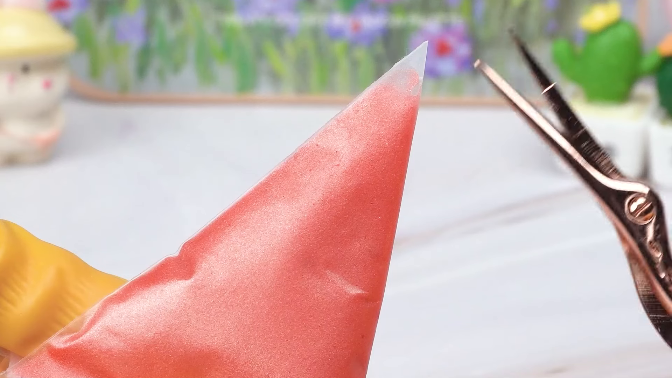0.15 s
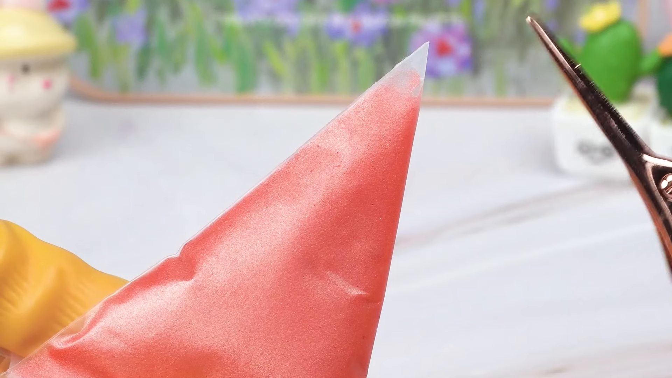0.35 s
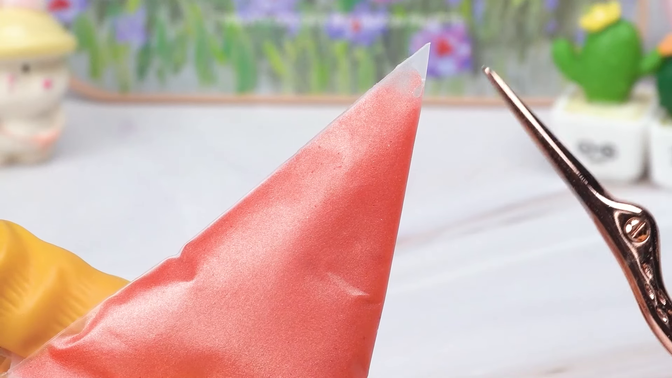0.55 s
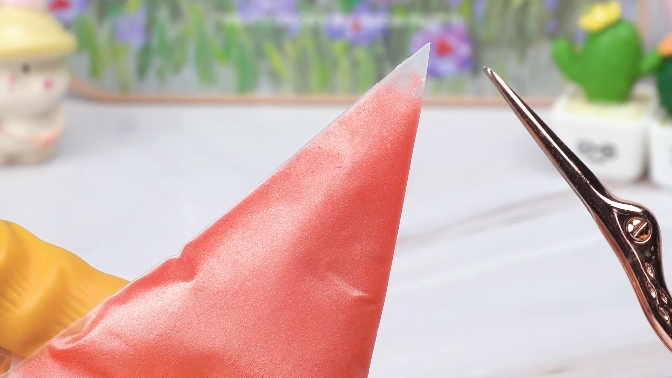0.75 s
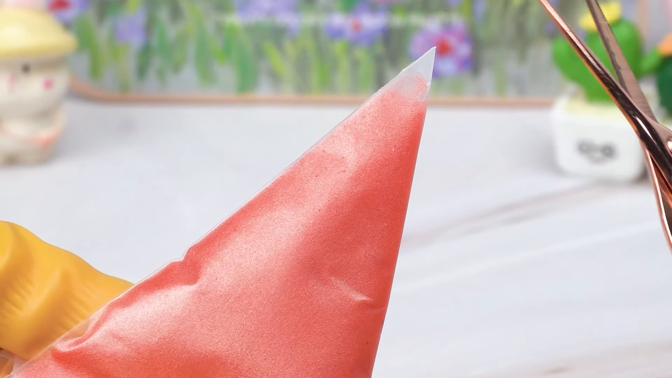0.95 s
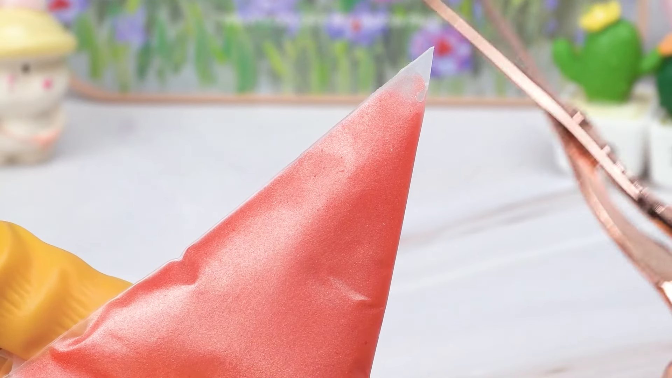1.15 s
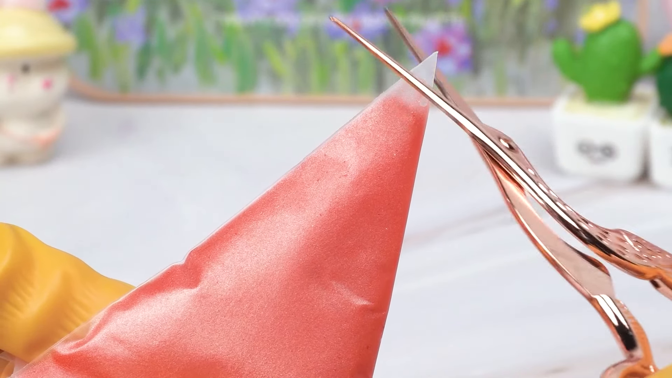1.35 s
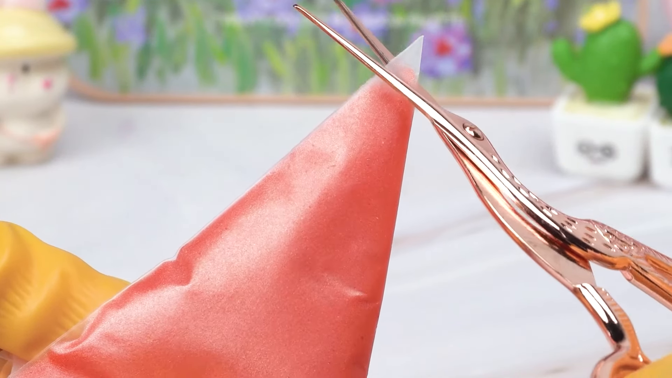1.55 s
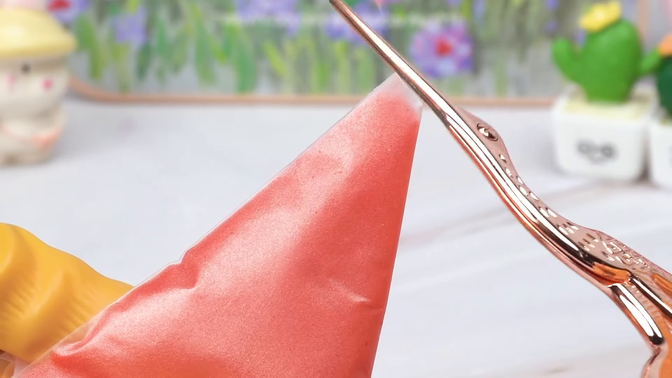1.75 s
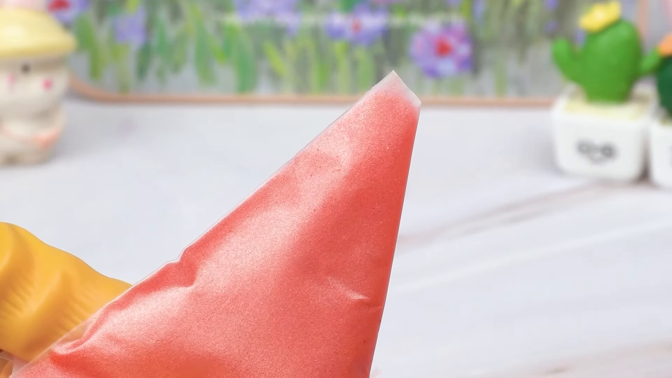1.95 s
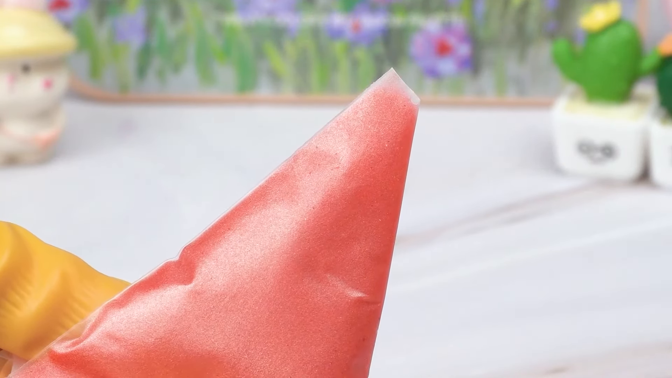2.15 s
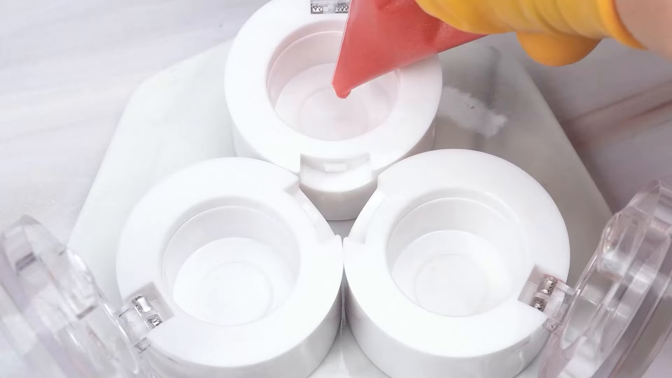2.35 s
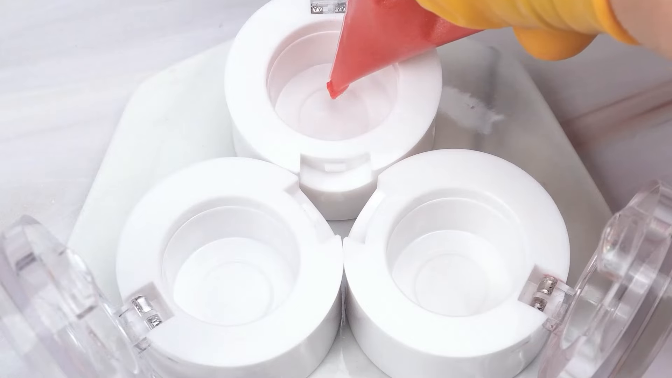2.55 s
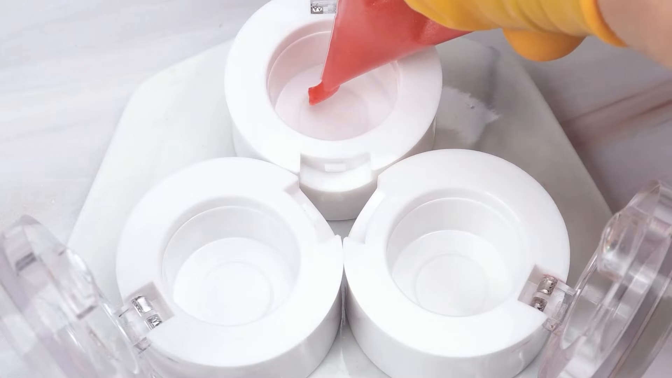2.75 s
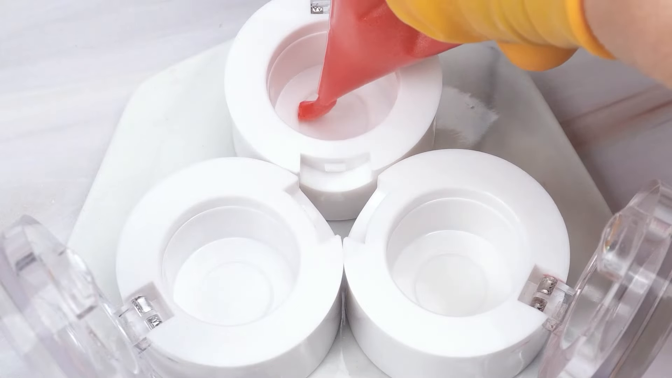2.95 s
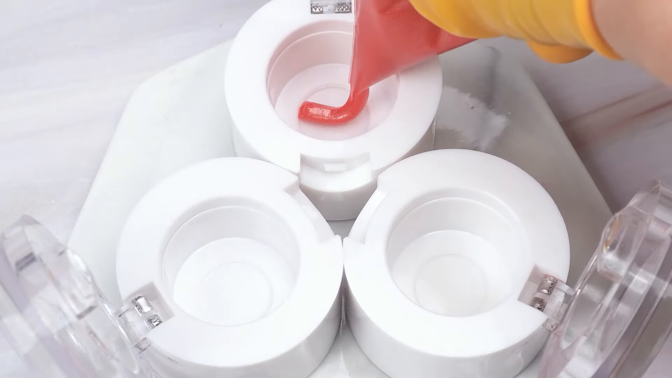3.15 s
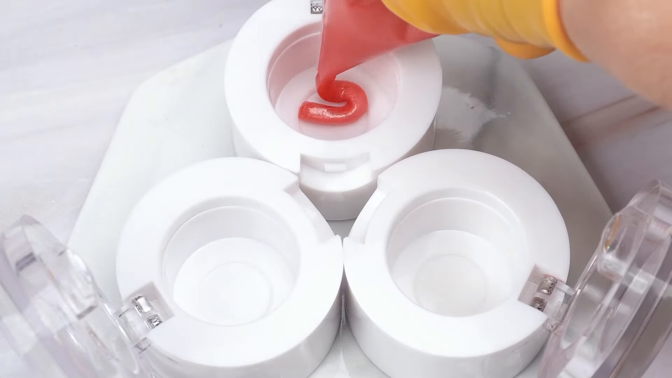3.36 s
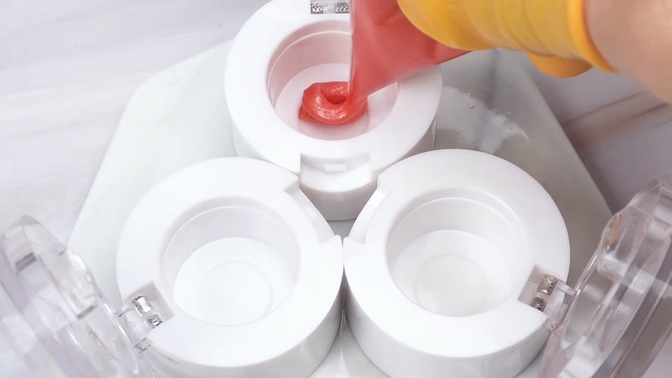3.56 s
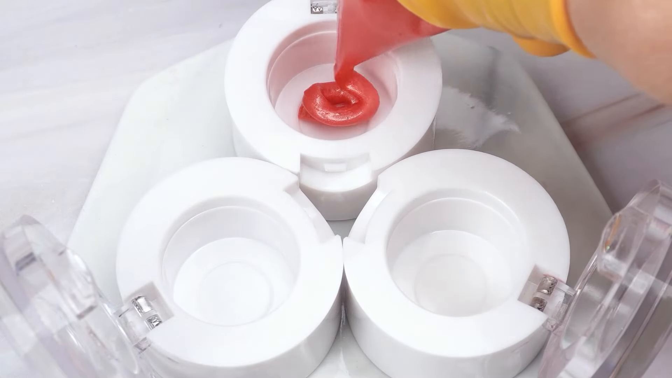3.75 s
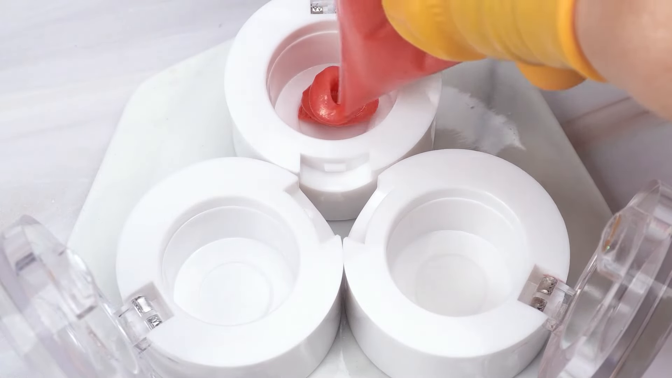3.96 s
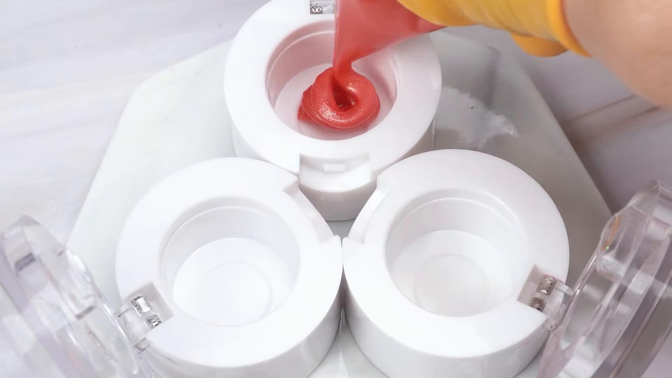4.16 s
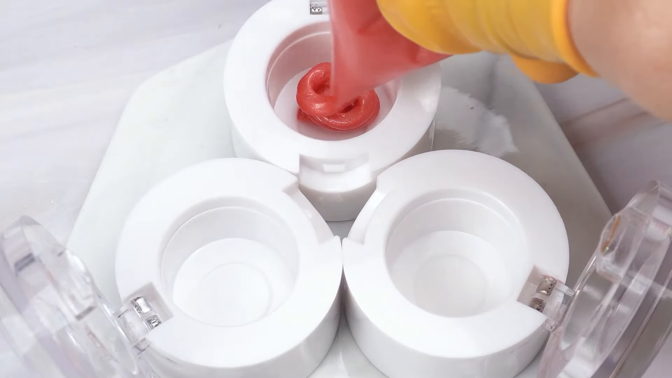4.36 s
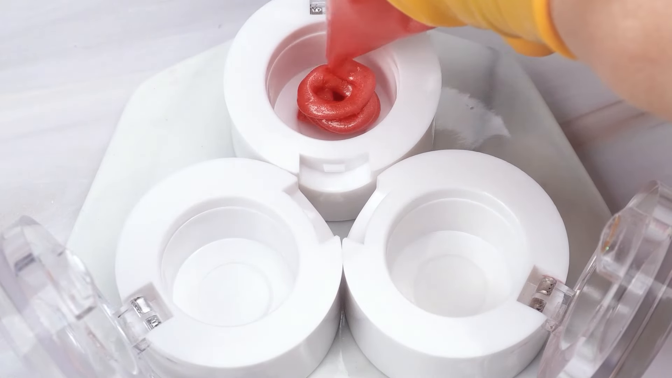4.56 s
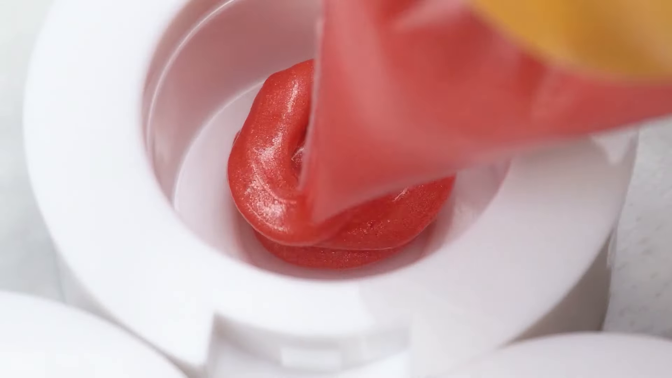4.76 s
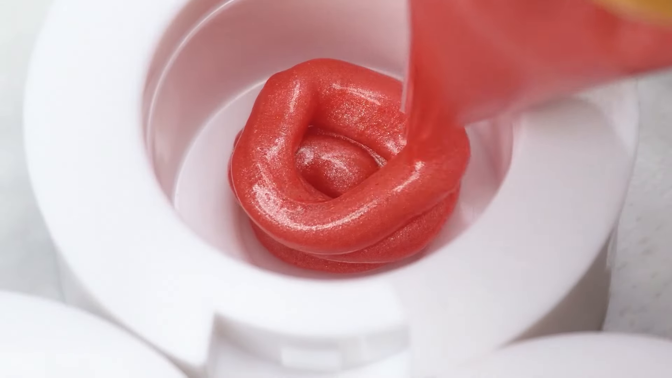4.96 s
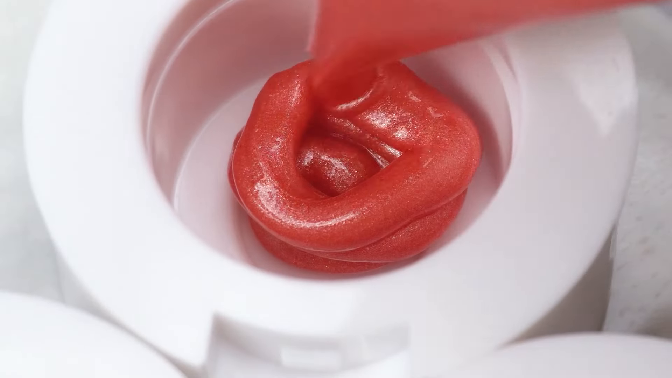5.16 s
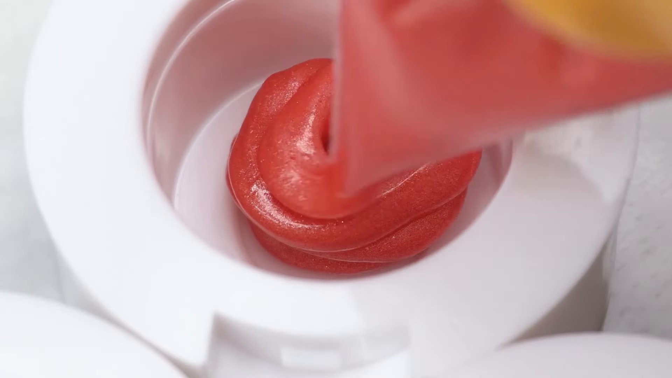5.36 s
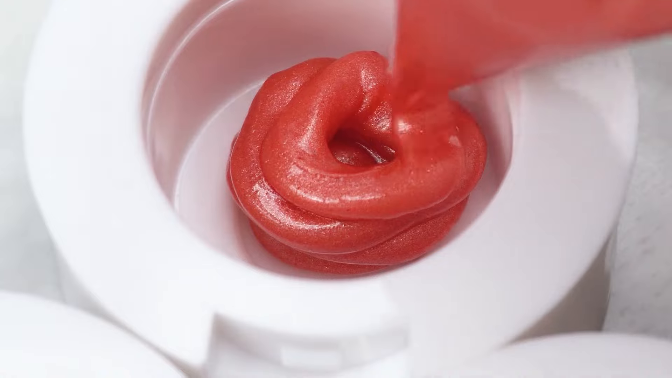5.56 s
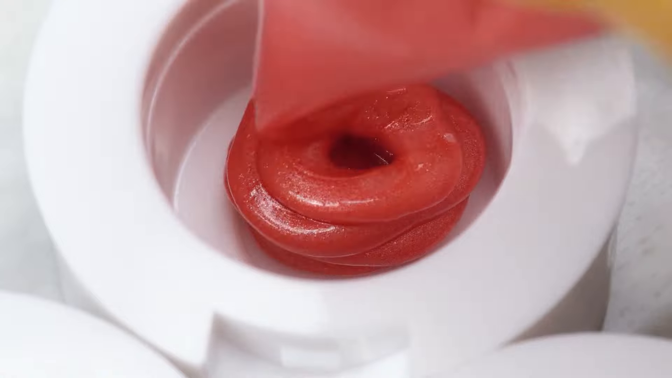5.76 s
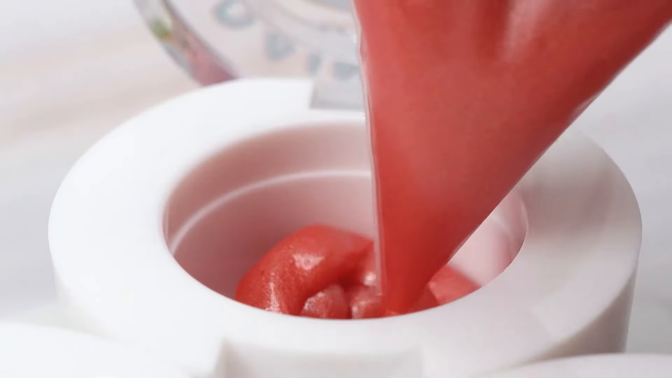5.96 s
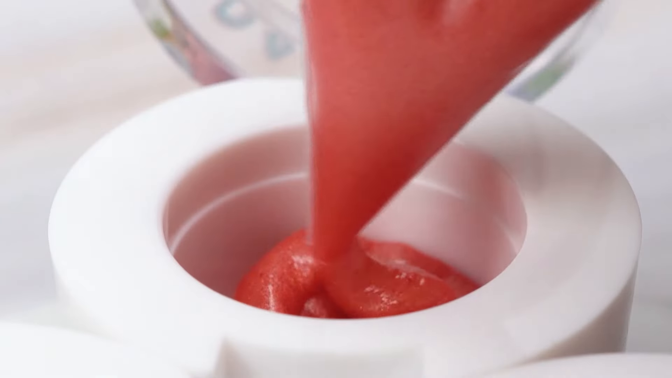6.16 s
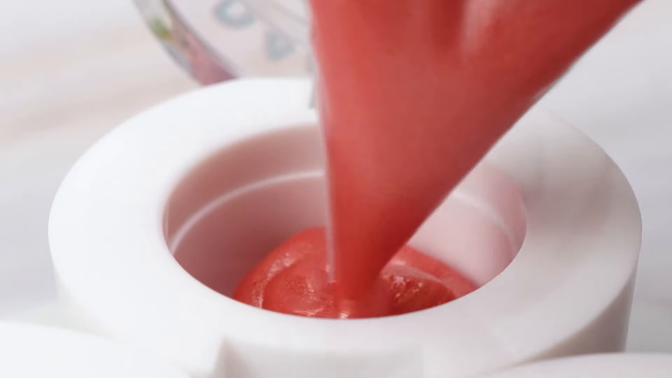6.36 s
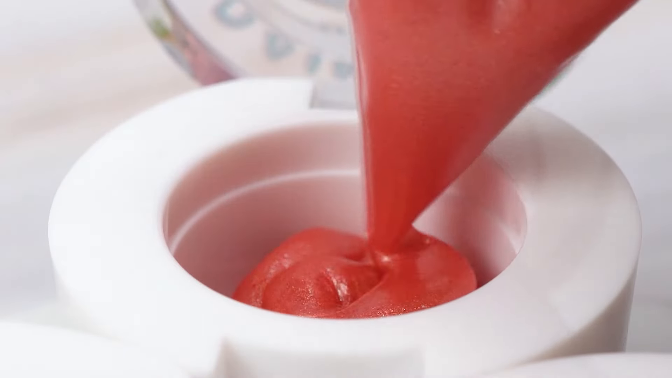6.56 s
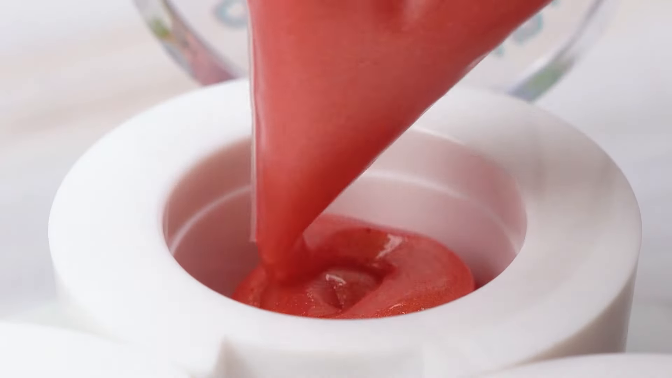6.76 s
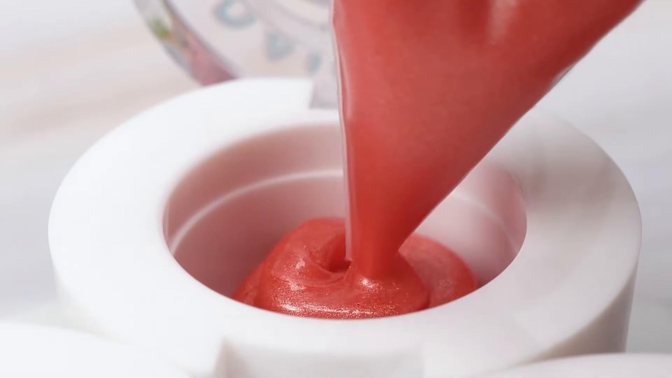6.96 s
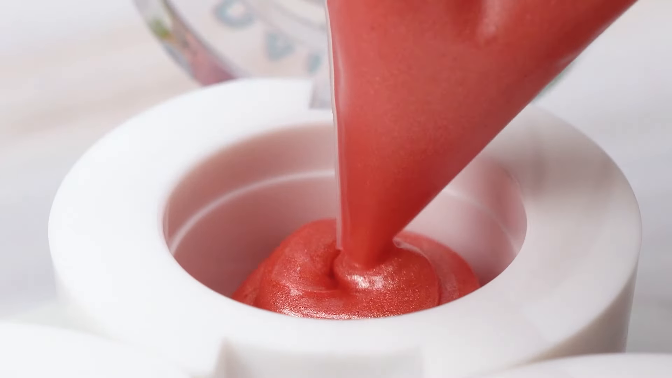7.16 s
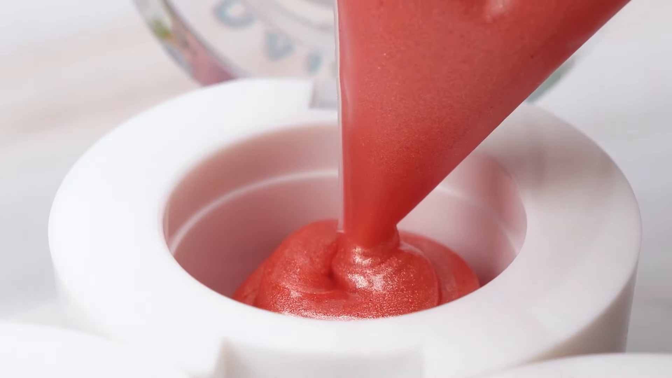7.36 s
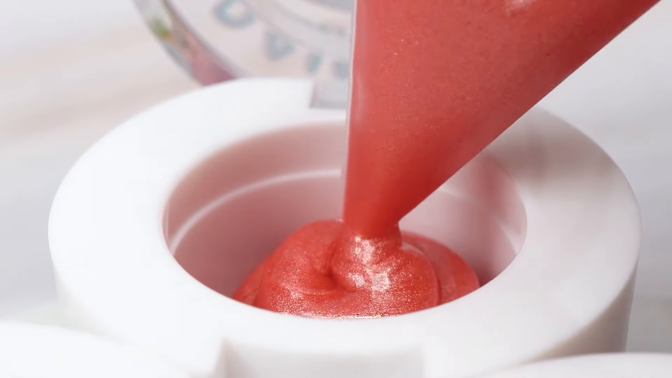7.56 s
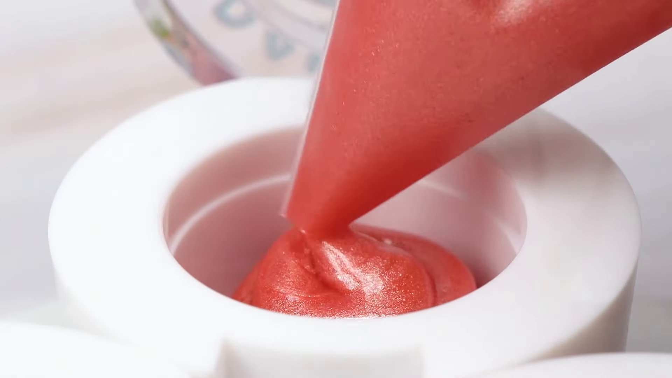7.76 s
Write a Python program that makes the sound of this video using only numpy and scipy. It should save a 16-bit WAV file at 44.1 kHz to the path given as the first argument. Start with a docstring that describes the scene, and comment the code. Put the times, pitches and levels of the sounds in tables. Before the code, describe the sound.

Very close on a quiet tabletop with soft ventilation murmur and hiss, small steel scissors click three times, squeak thinly, and cut through plastic film with a crisp crackle. They click shut and the tiny cut tip ticks onto the table. After a short pause, gloved hands squeeze the thin bag, crinkling densely and sharply, then more sparsely until it dies away.

```python
"""Close-miked tabletop in a quiet room, under a ventilation murmur with hiss, made of coloured noise.
Small steel scissors click (noisy contacts ring steel modes), then squeak open on two wavering sines.
They snip a plastic bag's tip (film bucklings and fine crackle) and click again; the tip drops and bounces.
Gloved hands then squeeze the bag: its thin film crackles in ringing snaps over a bed of filtered ticks,
with a low rumble of the hand, and near the end stretches of the crackle are heard once more."""
import sys
import numpy as np
from scipy import signal
from scipy.fft import rfft, irfft
from scipy.io import wavfile
from scipy.ndimage import uniform_filter1d

SR = 44100
rng = np.random.default_rng(int(sys.argv[2]) if len(sys.argv) > 2 else 0)


def log_audio(samples):
    """Write samples as a 16-bit WAV file to the path given in sys.argv[1]."""
    # one column per channel
    frames = np.atleast_2d(samples).T
    # limit to full scale, then quantise
    limited = np.clip(frames, -1, 1)
    pcm = np.round(limited * 32767).astype(np.int16)
    wavfile.write(sys.argv[1], SR, pcm)


def level_to_linear(level):
    """Convert decibel levels to linear amplitude factors, elementwise."""
    exponent = np.asarray(level, float) / 20
    return 10 ** exponent


N = 344421  # samples
TIME = np.arange(N) / SR  # s


def unit(x):
    """Scale to rms 1."""
    return x / np.sqrt(np.mean(x ** 2))


def ring(f, hz, sharp):
    """Response of a damped resonance, gain 1 at its centre."""
    return 1 / (1 + 1j * sharp * (f / hz - hz / f))


def bins(size):
    """Spectrum frequencies in Hz, kept off zero."""
    return np.maximum(np.fft.rfftfreq(size, 1 / SR), 1)


def coloured(points):
    """Noise of rms 1 with a spectrum drawn through (Hz, dB) points."""
    hz, db = np.transpose(points)
    colour = level_to_linear(np.interp(np.log(bins(N)), np.log(hz), db))
    return unit(irfft(rfft(rng.standard_normal(N)) * colour, N))


def add(out, s, sound):
    """Mix a short sound in at time s."""
    i = int(s * SR)
    n = min(len(sound), N - i)
    out[i:i + n] += sound[:n]


def tail(x, t60, db, lo_hz):
    """Short diffuse echo of the table top and nearby walls: decaying noise, convolved."""
    t = np.arange(int(t60 * SR)) / SR
    decay = np.exp(-np.log(1000) * t / t60)
    echo = rng.standard_normal(len(t)) * decay * np.minimum(t / 0.003, 1)
    echo = signal.sosfilt(signal.butter(2, lo_hz, "high", fs=SR, output="sos"), echo)
    echo = signal.sosfilt(signal.butter(1, 4000, fs=SR, output="sos"), echo)  # surfaces soak up the treble
    echo = echo / np.sqrt(np.sum(echo ** 2))
    return x + level_to_linear(db) * signal.fftconvolve(x, echo)[:len(x)]


# Spectrum of the murmur and hiss. Each row: frequency in Hz, relative level in dB.
ROOM_SPECTRUM = [(15, -40.5), (25, -10.5), (70, -17), (103, -3.5), (135, -2.5), (170, -0.5), (290, -8),
                 (350, -5), (500, -8.5), (800, -11.5), (1100, -15.5), (1500, -25), (2100, -30),
                 (5000, -32.5), (12200, -33.5), (15500, -37), (16500, -65)]
# The murmur is wide around the blows. Each row: time in seconds, side against mid level in dB.
ROOM_WIDTH = [(0, -6), (.75, -8), (.9, -37.5), (1.72, -33), (1.8, -6), (2.15, -6), (2.25, -38),
              (2.65, -35.5), (2.8, -57)]


def room():
    """Ventilation murmur over microphone hiss: steady mid noise and side noise of changing level."""
    level_db = -65.5
    mid = coloured(ROOM_SPECTRUM)
    side = coloured([(40, -24.5), (150, 1.5), (800, -11), (2400, -22), (15000, -29.5), (17000, -40.5)])
    width = level_to_linear(np.interp(TIME, *np.transpose(ROOM_WIDTH)))
    return level_to_linear(level_db) * (mid + width * side * np.array([[1], [-1]]))


# Rumble of the hand. Each row: time in seconds, level in dB.
HAND_RUMBLE = [(2.45, -95), (2.9, -83), (3.4, -70), (4.9, -72), (5.4, -74.5), (6.45, -72.5), (6.6, -68),
               (7.1, -66), (7.81, -69.5)]


def rumble():
    """The working hand shakes the table: low noise that follows a level curve."""
    shake = coloured([(15, -32), (30, -11.5), (42, -2.5), (70, -17.5), (120, -12.0), (300, -65)])
    return shake * level_to_linear(np.interp(TIME, *np.transpose(HAND_RUMBLE), left=-120))


def struck(events, modes, chatter_s, rattle_s, rattle_db, rise_db, crack_db, echo_db, echo_t60, dull):
    """A short rise of noise leads into a brief chatter and softer rattle; each channel has its own mode mix."""
    knock_db = -20.5  # the little bass that a blow does pass on
    right_lag_s = 0.0024  # sounds off to the side reach the right channel late
    right_shine_db = 13  # at 15 kHz: the right channel faces the blades and gets more of the top
    out, t, lead = np.zeros((2, N)), np.arange(1024) / SR, .004
    hz, db, t60 = np.transpose(modes)[:, :, None]
    rattle = level_to_linear(rattle_db) * np.exp(-((t - lead - rattle_s) / 0.00089) ** 2)
    rise = level_to_linear(rise_db) * (t / lead) ** 2
    force = np.where(t < lead, rise, np.exp(-(t - lead) / chatter_s) + rattle)
    # small objects radiate little bass
    thin = signal.ellip(6, 1, 60, 1950, "high", fs=SR, output="sos")
    for s, level_db, right_db in events:
        softer_db = level_db - events[0][1]  # a gentler contact misses the high modes
        for ch in range(2):
            spread_db = 2 * rng.standard_normal(hz.shape) + ch * right_shine_db * (hz / 15000) ** 4
            mix = level_to_linear(db + spread_db + dull * softer_db * np.log2(hz / hz[0]))
            decay = np.exp(-np.log(1000) * t / t60)
            body = np.sum(mix * np.sin(2 * np.pi * hz * t) * decay, axis=0)
            body[0] = level_to_linear(crack_db + dull * softer_db)  # direct crack of the contact
            push = force * rng.standard_normal(len(t))
            push[int(lead * SR)] = 2
            blow = np.convolve(push, body)
            blow = signal.sosfilt(thin, blow) + level_to_linear(knock_db) * blow
            peak = 2 * level_to_linear(level_db + (ch - 1.5) * right_db)
            add(out[ch], s - lead + ch * right_lag_s, peak * blow / np.abs(blow).max())
    return np.array([tail(x, echo_t60, echo_db, 1200) for x in out])


# The cut tip landing and bouncing.
# Each row: time in seconds, relative peak level in dB, right minus left in dB.
TIP_BOUNCES = [(1.9747, -23.5, 1), (2.0263, -47.5, 0), (2.0592, -53.5, -7.5), (2.0844, -53, 3),
               (2.1206, -46.5, 7)]
# Modes of the tip. Each row: frequency in Hz, relative level in dB, 60 dB decay in seconds.
TIP_MODES = [(2490, -25, 0.023), (2860, -15.5, 0.012), (3350, -6.5, 0.0039), (4360, -7, 0.006),
             (6400, 2.5, 0.001), (8900, -6.5, 0.0017), (10600, -13, .002)]


def tip():
    """The light plastic tip hits the table; its short modes dull as the bounces get softer."""
    return struck(TIP_BOUNCES, TIP_MODES, chatter_s=0.00038, rattle_s=0.0016, rattle_db=-38, rise_db=-18.0,
                  crack_db=0, echo_db=-13.5, echo_t60=0.086, dull=0.51)


# Pivot squeak, lower and upper pitch. Each row: time in seconds, pitch in Hz, rms level in dB.
LOW_SQUEAK = [(1.25, 11226, -93), (1.3, 11763, -77.5), (1.314, 11480, -92), (1.362, 11321, -83),
              (1.38, 11533, -107), (1.4, 10990, -96)]
HIGH_SQUEAK = [(1.24, 13140, -89), (1.248, 13337, -77.5), (1.278, 13722, -92), (1.342, 12770, -90),
               (1.422, 12159, -91), (1.43, 11990, -95)]


def squeak():
    """The pivot sticks and slips at two thin wavering pitches as the blades open: gliding sines."""
    out = 0
    for table in LOW_SQUEAK, HIGH_SQUEAK:
        s, hz, db = np.transpose(table)
        gain = np.interp(TIME, s, level_to_linear(db), left=0, right=0)
        phase = 2 * np.pi * np.cumsum(np.interp(TIME, s, hz)) / SR
        out = out + np.sqrt(2) * gain * np.sin(phase)
    return out


# Blades meeting. Each row: time in seconds, relative peak level in dB, right minus left in dB.
BLADES_MEET = [(.075, -12, 0.5), (.32, -9.5, 5.5), (.5972, -14.5, 5), (1.8217, -12, 3.5)]
# Modes of the steel. Each row: frequency in Hz, relative level in dB, 60 dB decay in seconds.
STEEL_MODES = [(2060, -3, 0.0021), (3180, -16, 0.011), (4600, -20, 0.013), (5600, -49, 0.0047),
               (7150, 0.5, 0.011), (8500, -11.5, 0.014), (10700, 2.5, 0.0032), (11530, 3, 0.0042),
               (13280, -0.5, 0.0055), (14680, 0, 0.0052), (14400, -1, 0.0076)]


def scissors():
    """Steel blades meet: a very short noisy contact rings bright, fast-dying modes."""
    return struck(BLADES_MEET, STEEL_MODES, chatter_s=0.00026, rattle_s=0.0048, rattle_db=-17.5, rise_db=-20,
                  crack_db=-31, echo_db=-17, echo_t60=.12, dull=0)


# Tone of the crackle over time: the top end falls after about three seconds.
# Each row: time in seconds, bass resonance in Hz, treble resonance in Hz, lowest top limit in Hz.
CRACKLE_TONE = [(1.5, 830, 11900, 17000), (2.8, 790, 11400, 16600), (3.9, 864, 9500, 13300),
                (4.9, 1288, 9500, 14400), (5.3, 1317, 8600, 11000)]


def creases(events, sharp=2.01, snap_s=0.0002, shiver_db=-21, shiver_s=0.0044, swell_db=-22, side_db=-4):
    """A short swell of noise, then a panel of film snaps through and shivers at its pitch, with bass and fizz."""
    out, size, lead = np.zeros(N), 2048, 128  # lead: samples of swell before the snap
    s, peak_db, hz, bass_db, treble_db = np.transpose(events)[:, :, None]
    t, f = (np.arange(size) - lead) / SR, bins(size)
    shiver = level_to_linear(shiver_db + 2.5 * rng.standard_normal(s.shape))
    shiver = shiver * np.exp(-np.abs(t) / shiver_s * np.sqrt(hz / 3000))  # high panels settle sooner
    swell = level_to_linear(swell_db) * np.exp(-np.abs(t) / 0.00078)
    force = np.where(t < 0, swell, 1.01 * np.exp(-np.abs(t) / snap_s) + shiver)
    grain = rng.standard_normal((len(s), size)) * rng.exponential(size=(len(s), size))
    push = grain * force
    push[:, lead] = 1
    when, *tone = np.transpose(CRACKLE_TONE)
    bass_hz, treble_hz, top_hz = (np.interp(s, when, c) for c in tone)
    push = rfft(push) / (1 + (f / np.maximum(top_hz, 1.2 * hz)) ** 12)
    parts = [(ring(f, hz, sharp), -side_db),
             (ring(f, bass_hz, 0.79), bass_db),
             (ring(f, treble_hz, 0.79), treble_db),
             (ring(f, 2160, 1.0), (bass_db + treble_db) / 2 + side_db)]
    snaps = 0
    for response, db in parts:
        part = irfft(push * response ** 2, size)
        snaps = snaps + level_to_linear(db) * part / np.abs(part).max(axis=1, keepdims=True)
    snaps = snaps * level_to_linear(peak_db) / np.abs(snaps).max(axis=1, keepdims=True)
    for at, snap in zip(s[:, 0], snaps):
        add(out, at - lead / SR, snap)
    return out


# Pressure on the bag. Each row: time in seconds, relative fine crackle level in dB, dullness in dB.
HAND_PRESSURE = [(2.449, -88.5, -2.5), (2.56, -74, -1.5), (2.75, -67.5, 3.5), (2.88, -59.5, 0),
                 (3.139, -61, 2.5), (3.37, -62, 1), (3.461, -59.5, 3.5), (3.8, -64, 5.5), (4.24, -66, 1.5),
                 (4.449, -72, 2.5), (4.569, -61, 4), (4.72, -57, 0.5), (4.869, -58.5, 3), (5.001, -73, 1),
                 (5.151, -63, 1.5), (5.29, -72, 2.5), (5.901, -74.5, 9.5), (6.05, -68, 2), (6.24, -68, 3.5),
                 (6.748, -81.5, 0)]


def small_creases(count=170, db_per_doubling=7.0, over_db=19, scatter_db=1.5, lo_hz=1800, hi_hz=11000,
                  bass_db=-12, treble_db=-3, treble_db_per_dullness=-4.0, colour_db=6):
    """Lesser bucklings at random moments, thicker and stronger the harder the fingers press."""
    s, db, dull_db = np.transpose(HAND_PRESSURE)
    even, bell = rng.random((count, 2)).T, rng.standard_normal((count, 3)).T
    odds = np.cumsum(2 ** (np.interp(TIME, s, db, left=-200, right=-200) / db_per_doubling))
    at = np.interp(even[0], odds / odds[-1], TIME)
    peak = np.interp(at, s, db) + over_db + scatter_db * bell[0]
    hz = lo_hz * (hi_hz / lo_hz) ** even[1]
    bass = bass_db + colour_db * bell[1]
    treble = treble_db + treble_db_per_dullness * np.interp(at, s, dull_db) + colour_db * bell[2]
    return np.transpose([at, peak, hz, bass, treble])


# Panels of film, big to small.
# Each row: resonance in Hz, relative level in dB, level change in dB per dB of dullness.
FILM_PANELS = [(757, -5, -5.5), (1553, -10.5, 2), (2670, -8.5, -1.15), (4200, -9, 0.2), (6500, -4.5, -1.78),
               (9500, -5, -5.5)]


def handling(table, snaps, rate=3500, scatter_db=5.0, near_s=0.0066, near_db=-16, fits_db=7.0):
    """Countless tiny creases (rate per second and panel size), thickest just after the big snaps."""
    s, db, dull_db = np.transpose(table)
    fade = np.clip(np.minimum(TIME - s[0], s[-1] + .02 - TIME) / .02, 0, 1)
    memory = np.exp(-TIME[:2048] / near_s) / near_s / SR
    near = np.sqrt(np.abs(signal.fftconvolve(snaps ** 2, memory)[:N]))
    dull_db, f, out = np.interp(TIME, s, dull_db), bins(N), 0
    for hz, panel_db, slope in FILM_PANELS:
        size = level_to_linear(scatter_db * np.minimum(rng.exponential(size=N), 3))  # larger ones are the big snaps
        ticks = (rng.random(N) < rate / SR) * rng.standard_normal(N) * size
        # each panel works in fits
        steps = np.repeat(rng.standard_normal(N // 600 + 1), 600)[:N]
        busy = unit(uniform_filter1d(steps, size=600))
        response = ring(f, hz, 1.1) ** 2 / (1 + (f / 13500) ** 8)
        crackle = unit(irfft(rfft(ticks) * response, N))
        out = out + level_to_linear(panel_db + slope * dull_db + fits_db * busy) * crackle
    level = level_to_linear(np.interp(TIME, s, db)) + level_to_linear(near_db) * near
    return fade * out * level / 2


# Stretches of the crackle heard once more, in turn. Each row: start in seconds, end in seconds,
# delay in seconds, gain in dB, cross-fade in seconds.
REPEATS = [(5.217, 5.553, .4109, 0, .004), (5.282, 6.6, 1.3182, 6, .2)]


def returning(x):
    """Each returning stretch fades in over what was sounding."""
    for start, end, later, db, fade in REPEATS:
        inside = np.minimum(TIME - later - start, end + later - TIME)
        share = np.clip(.5 + inside / fade, 0, 1)
        x = (1 - share) * x + share * level_to_linear(db) * np.roll(x, round(later * SR))
    return x


# The loud bucklings of the film, first under the blades, then the fingers.
# Each row: time in seconds, peak in dB, ring in Hz, relative bass in dB, relative treble in dB.
LOUD_CREASES = [(1.5316, -55, 1790, 2, -4), (1.5582, -60, 2000, -2, -13), (1.5804, -51.5, 6570, -11, -3),
                (1.5885, -37.5, 5640, 3, 6), (1.5945, -43, 1760, -1, -1), (1.5993, -40, 6350, -15, -3),
                (1.6034, -36.5, 7160, -4.5, 0), (1.6106, -28.5, 13050, -15, 8), (1.6207, -37, 8290, -25, 5),
                (1.6286, -43, 9630, -11, 3), (1.6399, -50, 4720, -10, -8), (1.6551, -50, 10420, -10, -1),
                (2.5645, -43.5, 8300, -10, 6), (2.5812, -46, 10250, -14, 4), (2.6692, -42.5, 7500, -3, 13),
                (2.7208, -43, 4220, -15, -23), (2.743, -44, 5720, 1, 8), (2.7561, -37, 7700, -5, 8),
                (2.7788, -46, 3320, 0, 13.5), (2.8121, -43, 13080, -18, -2), (2.8195, -32, 14150, -29, 22),
                (2.8276, -31.5, 9280, -6, 5), (2.8432, -38, 7190, -22, 13), (2.8736, -30.5, 6500, -17, 22),
                (2.8956, -31, 9000, -2, 0), (2.8993, -33.5, 5970, -9, 3), (2.9256, -35, 7644, -8, 2),
                (2.9333, -33.5, 3070, -4, 8), (2.9567, -32, 10300, -17, -1), (2.9745, -39, 9750, -9, -4),
                (2.9944, -41, 7040, -9, 4), (2.9996, -31, 6500, -12, 9), (3.0158, -36, 7340, 0, 10),
                (3.0239, -33, 5600, -7, 8), (3.0286, -33.5, 9640, -13, 3), (3.0479, -35, 8160, -20, 3),
                (3.0834, -33.5, 7000, -18, -14), (3.1163, -33, 5480, -13, 2), (3.142, -34, 3670, -9, -18.5),
                (3.1491, -28, 9280, -6.5, 3), (3.1577, -35, 10040, -4, -3), (3.1709, -27, 6060, 2, 11),
                (3.1792, -29.5, 966, 10, -14), (3.2053, -29, 3900, -5.5, -25),
                (3.2142, -37.5, 7100, -15, -7.5), (3.224, -27, 3010, 3, 9), (3.2364, -36.5, 6140, -7, 1),
                (3.2631, -43, 2744, -23, 3), (3.2904, -28, 6560, -33, -21), (3.3256, -27, 2206, -1, -24),
                (3.3496, -34.5, 1640, 2, 12), (3.362, -31, 1403, -23, -24.5), (3.4168, -30, 1510, -5, -6),
                (3.461, -33, 7500, -29, -1), (3.4737, -31, 3260, -30.5, -33),
                (3.4959, -33.5, 3466, -15, -21), (3.5053, -24, 6560, -18, -14),
                (3.5159, -37, 3280, -21, -10), (3.5385, -35.5, 3286, -25, -17),
                (3.6139, -36, 3520, -20, -20), (3.62, -35, 6150, -19, 4.5), (3.6649, -28, 2760, -11, -33),
                (3.6893, -34, 3430, -11, -20), (3.7037, -31, 8440, -3, -4), (3.7192, -32, 1970, -9.5, 1),
                (3.7288, -38, 8230, -23, -2), (3.7481, -40, 3230, -8, 5), (3.7552, -20, 1130, 5, -16),
                (3.7562, -41.5, 410, -17, -30.5), (3.7647, -20.5, 6240, -0.5, -30),
                (3.7903, -39, 1190, 13, -17), (3.8192, -30, 4200, -23, -19), (3.8411, -35.5, 8250, -1, -12),
                (3.857, -36, 3560, -2, -27), (3.8671, -31, 2940, -8, -5), (3.9165, -34, 5440, -30.5, 13),
                (3.9386, -30.5, 5250, -18, -13), (3.9526, -38.5, 3070, 0, -14), (3.9631, -34, 6400, 1, -20),
                (3.9789, -33.5, 4000, -17, -4.5), (4.009, -19.5, 6800, -31, -10),
                (4.0281, -31.5, 11300, -19, -5), (4.0604, -43, 4200, -17, -13),
                (4.0969, -29, 7440, -10, -22), (4.1331, -34.5, 2150, -24, -17),
                (4.1384, -28, 4810, -18, -5), (4.1688, -36, 3850, 9, -27), (4.1774, -33.5, 1590, -1, -2),
                (4.1967, -35, 3080, -9, -25), (4.2066, -34.5, 5740, -26.5, -4),
                (4.2329, -34.5, 2670, -1.5, -1), (4.263, -27, 6400, -6, 0), (4.2796, -32, 1280, 5, -32),
                (4.2937, -36, 8400, -25, 1), (4.3346, -33.5, 1920, 1, -4), (4.339, -28, 8600, -3.5, -17),
                (4.3507, -34.5, 3780, -6, -17), (4.3765, -28.5, 4680, -3.5, -22),
                (4.3869, -29.5, 2220, -4, -12), (4.3977, -22.5, 2130, -4, -3), (4.4608, -43, 8440, -16, -6),
                (4.5038, -38, 7560, -15, -12), (4.5171, -33, 7110, -27, -7), (4.5484, -26.5, 6650, -38, 3),
                (4.6063, -25, 4500, -25, -32), (4.6344, -28, 5410, -26, 11.5),
                (4.6666, -29.5, 6140, -31, -1), (4.6898, -30, 2750, -17, -20),
                (4.7333, -34, 1836, -16, -19.5), (4.7555, -32.5, 6360, -25.5, -10),
                (4.7859, -25, 5460, -24, -8), (4.7912, -27.5, 1590, -20, -22),
                (4.8179, -28.5, 3240, -20, -19), (4.8273, -32.5, 6640, -20, -2),
                (4.8386, -34, 6900, -4, -13.5), (4.862, -36.5, 4320, -14, -23),
                (4.9217, -42, 8000, -26, -9), (4.9446, -43, 8400, -1, -10), (5.0704, -31, 8300, -9, 21),
                (5.1189, -37.5, 1640, -6, -22), (5.1855, -43, 2600, -2, -5), (5.2032, -35.5, 1765, 4, -19),
                (5.2198, -39, 7100, -20, -8), (5.2295, -40.5, 3050, -4, -20.5), (5.2347, -42, 3160, -5, 0),
                (5.2492, -44.5, 8360, -23, 1), (5.3048, -32.5, 2820, -16, -22),
                (5.3073, -32, 2430, -7, -32), (5.3128, -42, 6950, -16, -20), (5.3198, -42, 8100, -2, -8),
                (5.335, -36.5, 8000, -22, 6.5), (5.363, -37.5, 2120, 15, 11), (5.4102, -38.5, 990, 1, 3),
                (5.4305, -46, 12400, -19.5, 9), (5.457, -54.5, 3440, -21, -14),
                (5.4722, -38, 4540, -25, -10), (5.4977, -37, 2660, -20, -28.5),
                (5.5018, -35, 2550, 3.5, -33), (5.5184, -47, 3000, -20, 5), (5.5585, -34.5, 1890, 3, -31),
                (5.5632, -39.5, 2860, 4, -27), (5.6168, -33.5, 1600, -1, -20.5),
                (5.6254, -37.5, 4070, -9, -19.5), (5.9695, -34.5, 1640, 9, -32),
                (5.9781, -40.5, 7200, -19, 14), (5.9864, -45.5, 1770, 21, -26),
                (5.9966, -39.5, 5200, -18, 7), (6.0273, -48.5, 7730, -24, -3),
                (6.0597, -46.5, 8900, -23.5, -4), (6.0816, -43.5, 9800, -16, -4),
                (6.0975, -35, 8900, -32, 10), (6.1203, -48, 1830, 5.5, -23), (6.1656, -38, 3110, -14, -1),
                (6.1769, -44, 5780, -24, 18.5), (6.1949, -48.5, 2300, -28, 20),
                (6.2276, -42, 4280, -20, -14), (6.2415, -35.5, 5450, -26, -19),
                (6.2489, -36.5, 1620, 14, -13), (6.2817, -33, 4460, -4, -4.5),
                (6.3508, -36, 4070, -31, -22.5), (6.3835, -35, 1830, 3, -41), (6.3937, -35, 3500, -32, -29),
                (6.4287, -47, 8170, -23, -2), (6.4419, -26.5, 3270, -11.5, -31),
                (6.459, -34.5, 4900, -23, -28), (6.4858, -49, 3450, -24, -10), (6.5131, -42, 3930, 5, -28),
                (6.5386, -34, 5970, -13, -30), (6.6072, -32.5, 5000, -28.5, -18)]
# Blades cutting the film. Each row: time in seconds, relative fine crackle level in dB, dullness in dB.
CUT_PRESSURE = [(1.5, -82, 0), (1.572, -77, 0), (1.582, -49.5, 0), (1.63, -56.5, 0), (1.66, -67, 0),
                (1.7, -79, 0.0061)]


def bag():
    """Thin film buckles in loud and lesser snaps over fine crackle, with a short echo."""
    snaps = creases(LOUD_CREASES) + creases(small_creases())
    cut = handling(CUT_PRESSURE, snaps, rate=7000, scatter_db=5.0, fits_db=2.5)
    squeezed = handling(HAND_PRESSURE, snaps)
    return tail(returning(snaps + cut + squeezed), 0.13, -25.5, 710)


def scene():
    """Scissors and tip off to the side, bag in the middle."""
    return room() + rumble() + tip() + squeak() + scissors() + bag()


def roll_off(x):
    """The treble ends steeply here."""
    return signal.sosfilt(signal.butter(12, 17660, fs=SR, output="sos"), x)


def record(dry):
    """The top is cut steeply above 16.5 kHz."""
    top = signal.ellip(8, .3, 70, 16500, fs=SR, output="sos")
    mix = signal.sosfilt(top, dry)
    return roll_off(mix)


dry = scene()
out = record(dry)
log_audio(out)
```